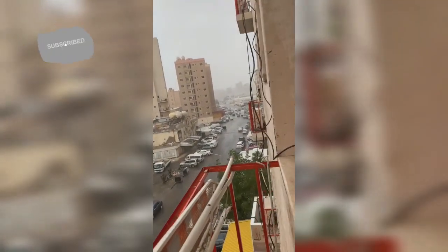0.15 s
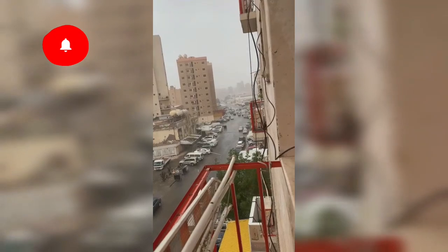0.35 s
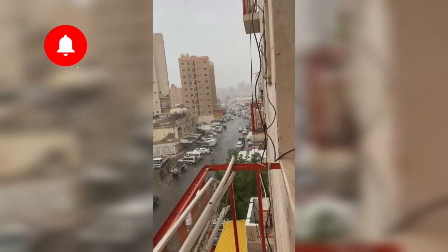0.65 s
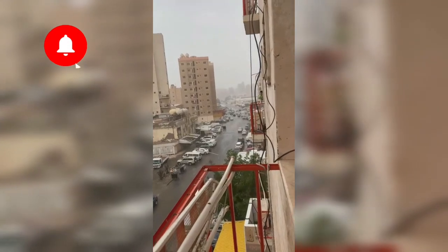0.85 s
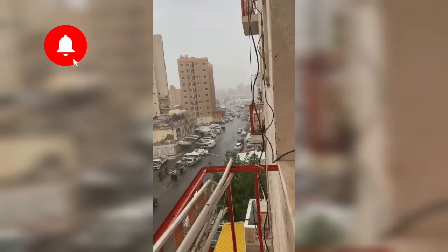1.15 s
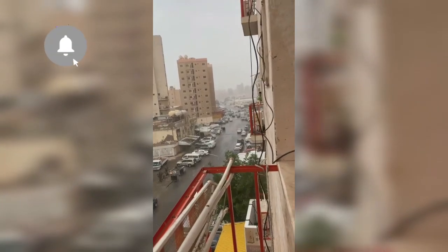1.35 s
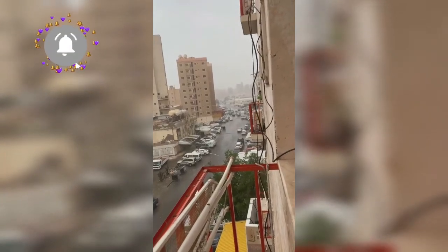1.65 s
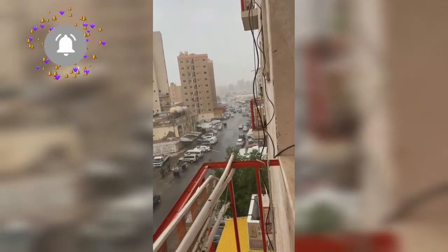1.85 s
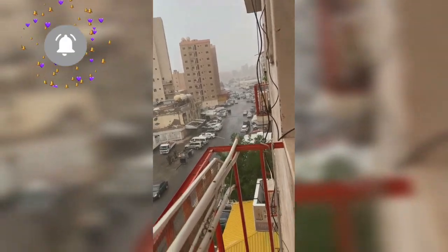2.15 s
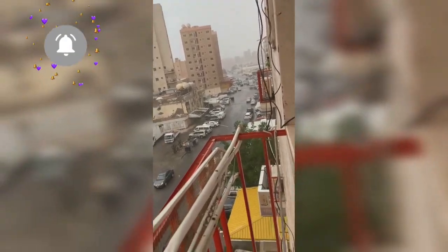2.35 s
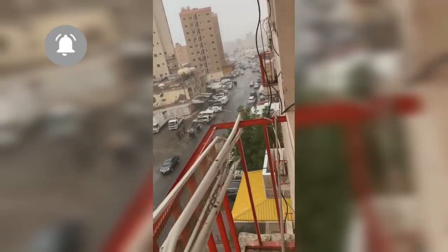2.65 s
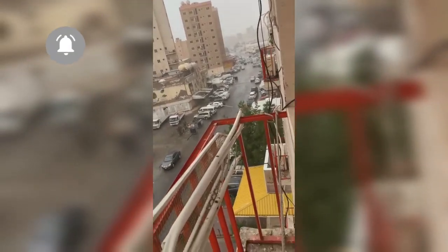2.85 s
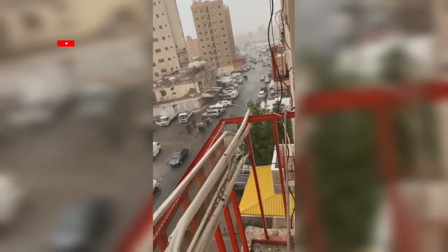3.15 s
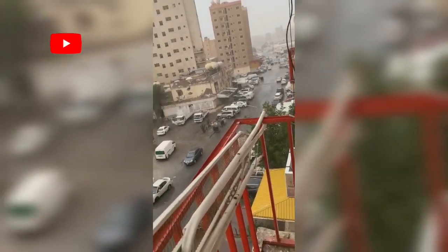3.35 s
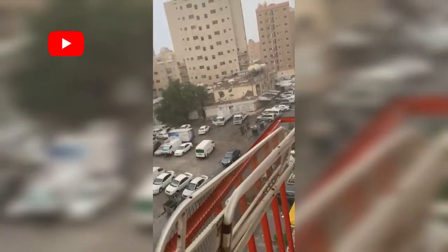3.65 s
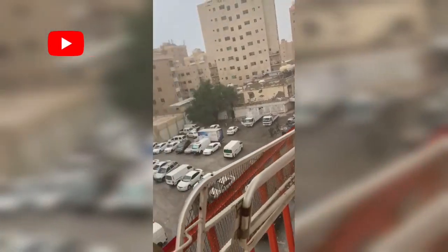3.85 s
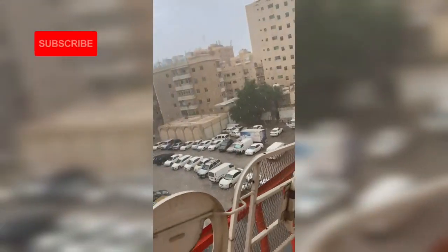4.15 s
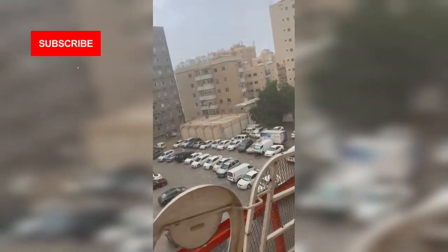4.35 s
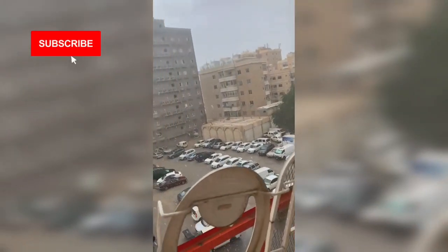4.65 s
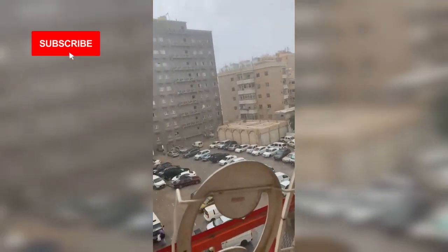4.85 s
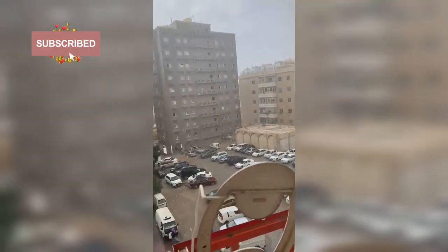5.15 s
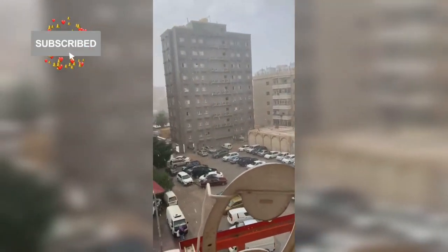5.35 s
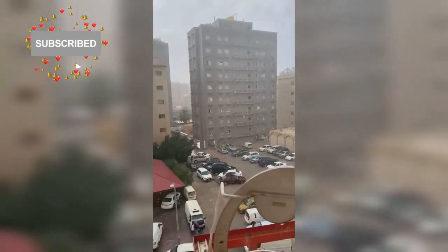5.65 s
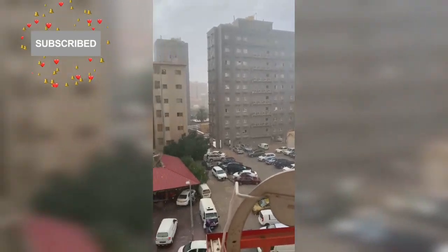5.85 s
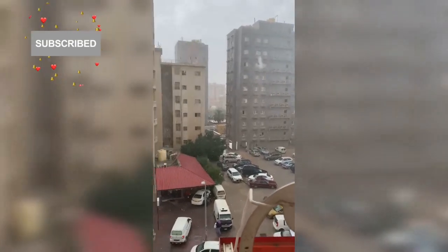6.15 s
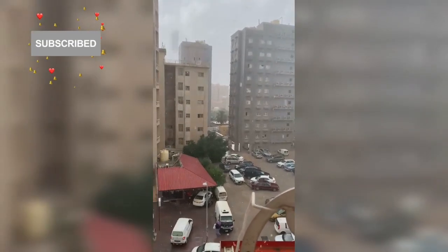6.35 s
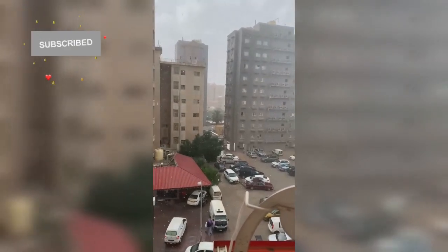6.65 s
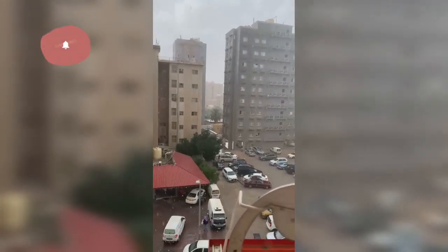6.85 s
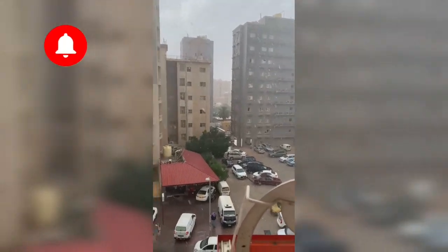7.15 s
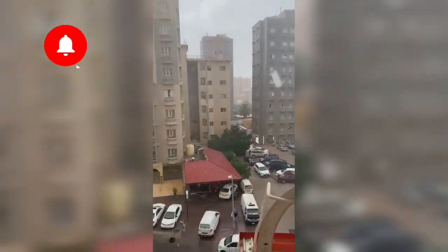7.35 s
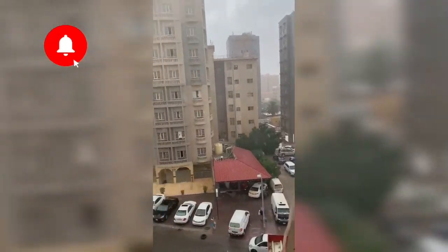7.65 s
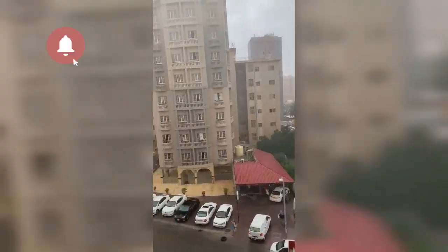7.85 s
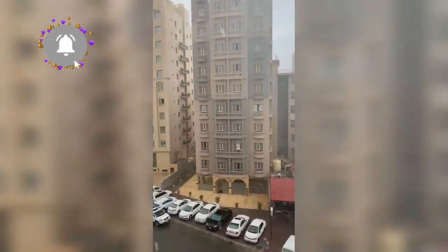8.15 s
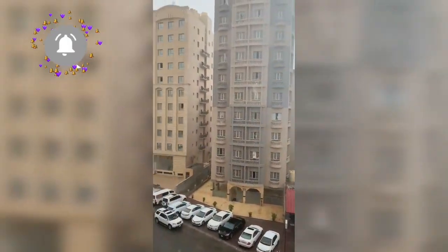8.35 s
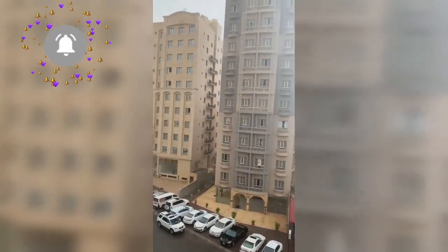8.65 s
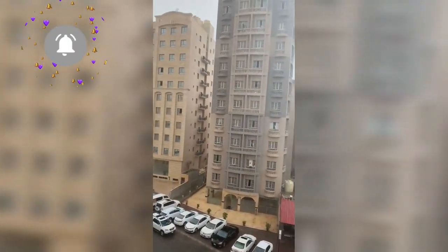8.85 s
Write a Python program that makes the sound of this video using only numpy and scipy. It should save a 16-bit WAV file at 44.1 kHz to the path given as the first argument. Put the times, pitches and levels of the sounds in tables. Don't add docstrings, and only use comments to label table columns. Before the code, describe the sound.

Outdoor rain from a high balcony: broad street roar, crisp hiss, low buffeting wind, then sharp close drops spattering around the middle.

```python
import sys
import numpy as np
from scipy import signal
from scipy.fft import rfft, irfft, next_fast_len
from scipy.io import wavfile
from scipy.ndimage import uniform_filter1d

SR = 44100
rng = np.random.default_rng(int(sys.argv[2]) if len(sys.argv) > 2 else 0)


def voltage_ratio(decibels):
    exponent = np.asarray(decibels, float) / 20
    return 10 ** exponent


def wrap_up_sound(samples):
    columns = np.atleast_2d(samples).T
    tamed = np.clip(columns, -1, 1)
    steps = np.round(tamed * 32767).astype(np.int16)
    wavfile.write(sys.argv[1], SR, steps)


N = 396893

# time in seconds, shower strength in dB,
# facing into the spray 0-1, left-right shade in dB.
PAN = [(0, -0.5, 0, -3), (.75, 0, 0, -2), (1.3, 3, 0, -4), (1.7, -1, 0.14, -1), (2.4, .5, 0, -3),
       (2.9, 0, 0, -3), (3.5, 2.2, 0.1, -3), (4.25, 2, 0.5, -3), (4.7, 2, 0.6, -3), (5.4, 3.5, 0.92, -1.5),
       (6.1, 2.5, 0.9, -3), (7, .5, 0.87, -2), (7.4, 1, 0.56, -1.5), (7.95, -0.5, 1, -1.5),
       (8.4, 0.5, 0.8, -3.5), (9, -0.5, 0.8, -3)]
# centre in seconds, length in seconds,
# depth in dB.
LULLS = [
    (0.753, 0.16, -5),
    (0.853, 0.053, -5),
    (0.98, 0.1, -4.5),
    (1.16, 0.22, -4),
    (3.417, .08, 0),
    (3.7, .12, -1.5),
    (4.997, 0.12, -3.5),
    (5.1, .06, -5),
    (6.916, .1, -3),
    (7.994, 0.13, -3),
]


def evened(x):
    return x / np.sqrt(np.mean(x ** 2) + 1e-20)


def read(points, hz):
    f, value = np.transpose(points)
    return np.interp(np.log(hz + 1), np.log(f + 1), value, -90, -90)


def curves(rows, t):
    s, *columns = np.transpose(rows)
    return [np.interp(t, s, c) for c in columns]


def bells(rows, t, order=2):
    s, length = np.transpose(rows)[:2, :, None]
    return np.exp(-abs(2 * (t - s) / length) ** order)


def coloured(x, points):
    size = next_fast_len(x.shape[-1])
    gain = voltage_ratio(read(points, np.fft.rfftfreq(size, 1 / SR)))
    return irfft(rfft(x, size) * gain, size)[..., :x.shape[-1]]


def rain_db(t):
    # level in dB, share of the shower (ratio), rise when facing the spray in dB.
    layers = [
        (-31, 0.38, 0),
        (-39.5, 0.93, 0),
        (-50, 0.62, 4.5),
    ]
    shower_db, facing, _ = curves(PAN, t)
    return [db + share * shower_db + rise_db * facing for db, share, rise_db in layers]


def wash(hz, t):
    # frequency in Hz, level in dB per Hz.
    roar_spectrum = [(150, -12), (300, -5), (500, 0.5), (800, 0), (1300, -2), (1900, -6), (2600, -8),
                     (4000, -17.5)]
    hiss_spectrum = [(1200, -51), (2000, -33), (3000, -0.5), (4500, 0.5), (6500, -1.5), (8000, -6),
                     (9400, -16.5), (10500, -12)]
    spray_spectrum = [(8000, 4), (9600, -3), (11000, -3.5), (12700, 0), (14000, -6), (15000, -3.5),
                      (15400, -14), (16000, -18)]
    patches = rng.standard_normal((len(t), len(hz))).T
    patches = uniform_filter1d(patches, size=6, axis=0)
    patches = evened(uniform_filter1d(patches, size=24, axis=1))
    flicker = uniform_filter1d(rng.standard_normal(len(t)), size=12)
    flicker = evened(uniform_filter1d(flicker, size=8))
    power = 0
    spectra = (roar_spectrum, hiss_spectrum, spray_spectrum)
    for spectrum, level_db, flicker_db in zip(spectra, rain_db(t), (.3, .7, 1.1)):
        colour = evened(voltage_ratio(read(spectrum, hz)))[:, None]
        power = power + (colour * voltage_ratio(level_db + flicker_db * flicker)) ** 2
    return np.sqrt(power) * voltage_ratio(1.3 * patches - 20.0)


def whine():
    whine_hz, whine_db = 15332, -58
    return voltage_ratio(whine_db) * np.sin(2 * np.pi * whine_hz * np.arange(N) / SR)


def wind_db():
    # centre in seconds, length in seconds, buffeting in dB, flutter in dB.
    gust_table = [(0.168, 0.039, -29, -50), (0.288, 0.059, -33, -47), (0.396, 0.036, -41, -47),
                  (.48, .05, -41, -43), (0.573, 0.079, -28.5, -46), (.855, 0.052, -22.5, -36.5),
                  (.985, 0.056, -24.5, -52), (1.054, 0.061, -34, -42), (1.33, 0.12, -36, -52),
                  (1.542, 0.04, -43, -37), (2.323, .09, -33, -35), (2.513, 0.18, -26.5, -40),
                  (2.604, 0.061, -20, -44), (2.774, 0.089, -29.5, -34.5), (2.876, 0.041, -40, -29),
                  (2.98, 0.046, -24.5, -38), (3.11, .13, -32.5, -33), (3.305, 0.11, -20.5, -28),
                  (5.048, .07, -30, -45), (5.167, 0.094, -30, -38), (5.266, 0.11, -32, -34.5),
                  (5.455, 0.078, -28, -31.5), (5.84, 0.049, -26.5, -36), (6.77, 0.079, -36, -51),
                  (7.08, .13, -36, -50), (7.316, 0.068, -34, -34), (7.395, 0.055, -29, -47),
                  (7.499, 0.06, -35, -30), (7.79, 0.041, -30, -36), (8.62, 0.077, -32, -48)]
    # calm level in dB, rise when facing the spray in dB,
    # lumps in dB, share of the lulls (ratio).
    breeze_table = [
        (-36, -2, 3, 0.91),
        (-37, 4.5, 1.5, 1.66),
    ]
    # centre in seconds, length in seconds, level in dB.
    slap_table = [
        (2.501, 0.014, -28),
        (2.605, 0.011, -32),
        (3.278, 0.013, -30),
        (3.304, 0.017, -22),
        (3.348, .016, -25.5),
        (5.19, .016, -31),
        (7.492, .014, -32),
        (7.796, 0.012, -33),
    ]
    tick_s, lump_s = .002, .04
    t = np.arange(0, N / SR, tick_s)
    sample_s = np.arange(N) / SR
    lumps = rng.standard_normal((len(t), 2)).T
    for _ in range(2):
        lumps = uniform_filter1d(lumps, size=round(lump_s / tick_s))
    lumps = evened(lumps)
    still_db = np.transpose(LULLS)[2] @ bells(LULLS, t)
    facing = curves(PAN, t)[1]
    levels = []
    for row, lump, gust_db in zip(breeze_table, lumps, np.transpose(gust_table)[2:]):
        calm_db, rise_db, lumps_db, share = row
        breeze = voltage_ratio(calm_db + rise_db * facing + lumps_db * lump + share * still_db)
        power = breeze ** 2 + voltage_ratio(gust_db) ** 2 @ bells(gust_table, t, order=3) ** 2
        levels.append(np.interp(sample_s, t, 10 * np.log10(power)))
    slaps = voltage_ratio(np.transpose(slap_table)[2]) @ bells(slap_table, t)
    levels.append(np.interp(sample_s, t, 20 * np.log10(slaps + 1e-5)))
    return levels


def steadied(x, share):
    swell = abs(signal.hilbert(x, next_fast_len(N)))[..., :N]
    return evened(x / (swell + .1) ** share)


def wind():
    # frequency in Hz, level in dB.
    buffet_spectrum = [(20, -13), (35, -22.5), (50, -1), (70, 0), (100, -5.5), (140, -10), (220, -20)]
    flutter_spectrum = [(80, -12), (130, -2), (190, 0), (280, -3.5), (400, -10.5), (700, -40)]
    slap_spectrum = [(150, -25), (260, -2.5), (380, 1.5), (520, -8.5), (800, -25.5)]
    spectra = (buffet_spectrum, flutter_spectrum, slap_spectrum)
    out = 0
    for spectrum, level_db, calm_db, pan_db in zip(spectra, wind_db(), (-32, -30, -36), (0.3, -2.8, -2.5)):
        noise = evened(coloured(rng.standard_normal((N, 2)).T, spectrum))
        a, b = steadied(noise, 0.56)
        same = 0.82 / (1 + voltage_ratio(level_db - calm_db) ** 2 * 0.35)
        left = a * voltage_ratio(pan_db / 2)
        right = (same * a + np.sqrt(1 - same ** 2) * b) / voltage_ratio(pan_db / 2)
        out = out + np.array([left, right]) * voltage_ratio(level_db) / np.sqrt((1 + same) / 2)
    return out


def splash(db, tilt_db, t60, ring_hz, chance):
    # frequency in Hz, level in dB.
    splash_spectrum = [(500, -24), (1500, 10.5), (3000, 6), (6500, 0), (9000, -2), (13000, -1),
                       (16000, -10)]
    t = np.arange(len(chance)) / SR
    tipped = [(hz, level + tilt_db * np.log2(hz / 6000)) for hz, level in splash_spectrum]
    burst = evened(coloured(chance, tipped))
    ring = evened(signal.lfilter(*signal.iirpeak(ring_hz, 9, SR), chance))
    swell = (1 - np.exp(-t / 0.0018)) ** 2
    swell = swell * (1 + 1.5 * np.exp(-t / 0.0043))
    return voltage_ratio(db - 60 * t / max(t60, .01)) * swell * (burst + .5 * ring)


def drops():
    # start in seconds, peak in dB, brightness in dB per octave, t60 in seconds, ring in Hz.
    drop_table = [(3.3308, -19.5, -2, 0.068, 3100), (3.7013, -18.5, -4, 0.086, 2950),
                  (4.328, -24, 1.5, 0.12, 3000), (4.6444, -30, 2, 0.06, 3460),
                  (4.7114, -19.5, 2, 0.061, 7300), (4.7262, -15, 0.1, 0.081, 6750),
                  (4.9248, -25, 12, 0.062, 4220), (4.9963, -21, -3.5, 0.067, 7450),
                  (5.1334, -18, -2, 0.074, 6700), (5.1607, -18.5, 1.5, 0.08, 4540),
                  (5.233, -18.5, -1, 0.074, 13000), (5.4941, -12.5, 1.5, 0.056, 6860),
                  (5.635, -14.5, 1.5, 0.054, 4000), (5.6885, -24.5, -3, 0.06, 6650),
                  (5.8997, -30, 0.1, 0.064, 3290), (6.2506, -23, 7, 0.07, 3080),
                  (6.576, -23, 3.5, 0.059, 4540), (7.2524, -24.5, 8, 0.056, 6960),
                  (7.5994, -35, 10, 0.07, 3070), (8.15, -24.5, -10, 0.1, 6850),
                  (8.3294, -34, 8, 0.07, 3650)]
    length = 8000
    out = np.zeros(N + length)
    chance = rng.standard_normal((len(drop_table), length))
    for (s, db, tilt_db, t60, ring_hz), row in zip(drop_table, chance):
        out[round(s * SR):][:length] += splash(db - 3.5, tilt_db, t60, ring_hz, row)
    spray_db = rain_db(np.arange(N) / SR)[2]
    for row in rng.standard_normal((6, 2000)):
        sizes = voltage_ratio(1.5 * np.minimum(rng.exponential(1, N), 4))
        hits = sizes * (rng.random(N) < 5.5 / SR)
        droplet = splash(0, -0.55, 0.052, rng.uniform(3000, 13000), row)
        out[:N] += signal.oaconvolve(hits * voltage_ratio(spray_db - 17.0), droplet)[:N]
    return out[:N]


def port_pair(hz):
    # lower edge in Hz, upper edge in Hz, likeness 0-1,
    # lag of the right port in half turns, likeness 0-1 in the gap above.
    locks = [
        (0, 400, .65, -.05, .1),
        (1200, 1500, .55, -.1, .2),
        (4750, 5400, .78, 3, .45),
        (7000, 7500, .7, 4, .47),
        (9050, 9580, .97, 5, .15),
        (11200, 11400, .58, 7, .35),
        (13000, 13700, .64, 8, .25),
        (15200, 16000, .2, 9, .2),
    ]
    lo, hi, like, lag, gap = np.transpose(locks)
    skirt = 40 + 2000 * (1 - like)
    half = (np.roll(lo, -1) - hi).clip(2) / 2
    down = hi + np.minimum(skirt, half)
    up = hi + 2 * half - np.minimum(np.roll(skirt, -1), half)
    same = np.interp(hz, np.ravel([lo, hi, down, up], "F"), np.ravel([like, like, gap, gap], "F"))
    return same, np.interp(hz, np.ravel([lo, hi], "F"), np.repeat(lag, 2))


def agreement(hz, t, lag):
    # centre in seconds, length in seconds,
    # depth in dB.
    deep_cancels = [(.2, .2, -4), (.63, .28, -6), (1.05, .22, -5), (1.7, .2, -3), (2.03, .15, -4),
                    (2.83, .25, -8), (3.47, .25, -4), (3.85, .2, -4), (4.62, .25, -7), (4.95, .35, -7),
                    (5.2, .1, -7), (5.4, .2, -8), (5.7, .12, -7), (6.0, .45, -10), (6.35, .35, -9),
                    (7.05, .2, -7), (7.5, .3, -9), (7.77, .25, -9), (8.35, .3, -2)]
    opposed_db, aligned_db, facing_db = -8.8, -7, -11.5
    deep_cancels_db = np.transpose(deep_cancels)[2] @ bells(deep_cancels, t)
    facing = np.clip(curves(PAN, t)[1], 0, 1)
    left_db = np.array([opposed_db + deep_cancels_db, aligned_db + facing_db * facing ** 2])
    left_over = voltage_ratio(.88 * left_db) ** 2
    opposed, aligned = np.log((1 - left_over) / (1 + left_over)) / np.log([[.78], [.7]])
    near_opposed = np.exp(-((hz - 5100) / 550) ** 2)
    near_aligned = (1 + np.cos(np.pi * lag)) / 2 * np.where(hz > 6000, 1, .4)
    usual = port_pair(hz)[0]
    aligned_pull = near_aligned * np.minimum(usual / 0.33, 1) * (aligned - 1)
    return usual ** (1 + near_opposed * (opposed - 1) + aligned_pull)


def ports():
    # time in seconds, share 0-1.
    swing = [
        (4, 0),
        (6.7, .45),
        (7, .25),
        (7.8, .6),
        (7.92, 1),
        (8.08, 1),
        (8.18, .55),
        (8.4, .25),
        (9, .2),
    ]
    # frequency in Hz, likeness 0-1, right lead in half turns.
    along = [(300, .45, .3), (700, .55, .7), (1400, .65, .6), (1900, .3, .8), (2800, .66, 1),
             (3300, .62, 1.05), (3900, .45, 1.25), (4500, .6, 1.15)]
    size, hop = 512, 128
    hz, t, near = signal.stft(drops(), SR, nperseg=size, noverlap=size - hop)
    hz = hz[:, None]
    _, facing, shade_db = curves(PAN, t)
    a, b, c, d, e = rng.standard_normal((len(t), len(hz), 5)).T
    drift = evened(uniform_filter1d(uniform_filter1d(e[0], size=24), size=16))
    patches = evened(uniform_filter1d(uniform_filter1d(e, size=4, axis=0), size=14, axis=1))

    shift_share = .018 * drift + .05 * facing ** 3 * (hz > 5900)
    seen_hz = hz * (1 + shift_share / (1 + (hz / 8600) ** 16))
    lag = port_pair(seen_hz)[1]
    swung = curves(swing, t)[0] / (1 + (hz / 4700) ** 20) / (1 + (250 / (hz + 1)) ** 2)
    like, lead = curves(along, hz)
    pair = (1 - swung) * agreement(seen_hz, t, lag) * np.exp(-1j * np.pi * lag)
    pair = pair + swung * like * np.exp(1j * np.pi * lead)
    same = abs(pair) ** voltage_ratio(2.6 * patches)
    shift = np.exp(1j * np.angle(pair))

    lull_db = .9 * np.transpose(LULLS)[2] @ bells(LULLS, t) / (1 + (hz / 450) ** 8)
    far = wash(hz[:, 0], t) * voltage_ratio(lull_db)
    close = np.minimum(same, .45)
    right = far * (same * shift * (a + 1j * b) + np.sqrt(1 - same ** 2) * (c + 1j * d))
    right += close * shift * near
    right += np.sqrt(1 - close ** 2) * abs(near) * np.exp(1j * np.angle(c + 1j * d))
    left = far * (a + 1j * b) + near
    shade = voltage_ratio(shade_db / 2 / (1 + (hz / 2400) ** 4))
    both = np.array([left * shade, right / shade])
    return signal.istft(both, SR, nperseg=size, noverlap=size - hop)[1][:, :N]


def scene():
    return ports() + wind() + whine()


def thinned_stereo(x, under_db, faint_db):
    size, hop = 2048, 1024
    sum_and_difference = np.array([x[0] + x[1], x[0] - x[1]]) / 2
    hz, _, z = signal.stft(sum_and_difference, SR, nperseg=size, noverlap=size - hop)
    hz = hz[:, None]
    power = uniform_filter1d(abs(z) ** 2, size=14, axis=1)
    band_centre = (np.arange(len(hz)) // 12 * 12 + 6).clip(0, len(hz) - 1)
    held = uniform_filter1d(power, size=2, axis=2)[:, band_centre]
    kept = (held > held[::-1] * voltage_ratio(-2 * under_db)) | (hz < 2300)
    kept &= (abs(z) ** 2 > power * voltage_ratio(2 * faint_db)) | (hz < 400)
    top = power[:, hz[:, 0] > 15100].mean(1)
    loud_top = np.percentile(top, [92, 50], axis=1).diagonal()[:, None]
    kept &= (hz < 15100) | (top > loud_top)[:, None]
    kept &= hz < 15740
    mid, side = signal.istft(z * kept, SR, nperseg=size, noverlap=size - hop)[1][:, :N]
    return np.array([mid + side, mid - side])


def roll_off(x):
    return signal.sosfilt(signal.butter(12, 15800, fs=SR, output="sos"), x)


def record(dry):
    mix = thinned_stereo(dry, under_db=7.5, faint_db=-3)
    return roll_off(mix)


dry = scene()
out = record(dry)
wrap_up_sound(out)
```